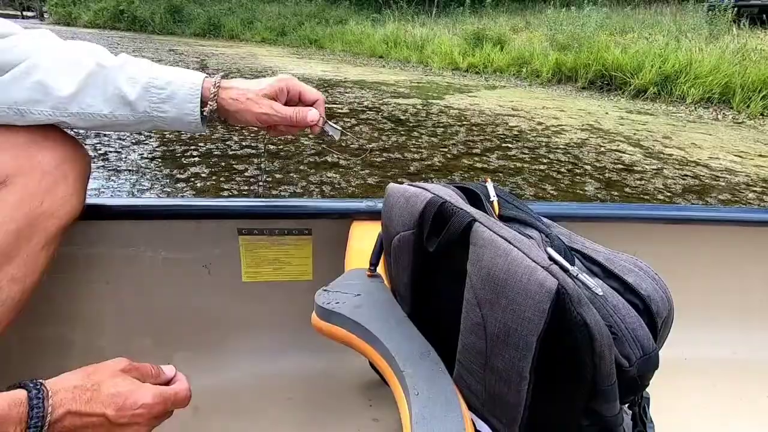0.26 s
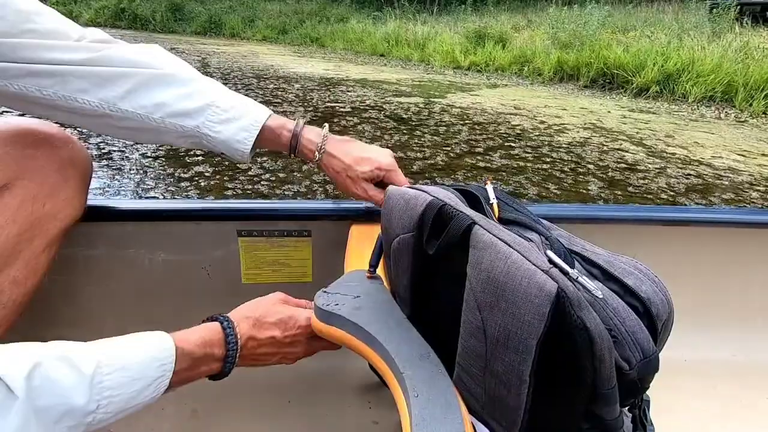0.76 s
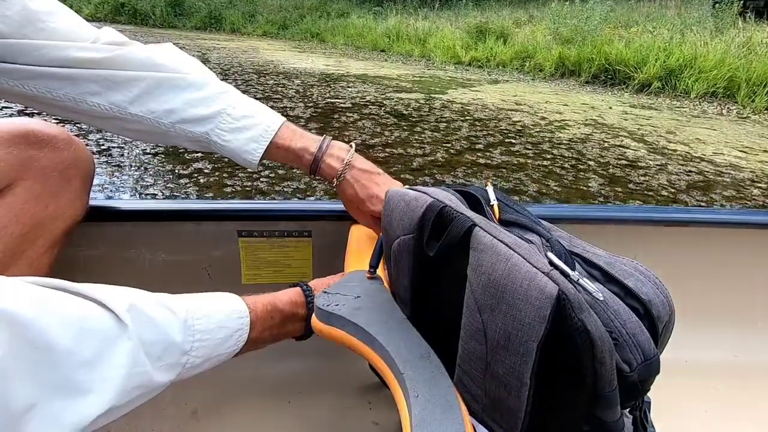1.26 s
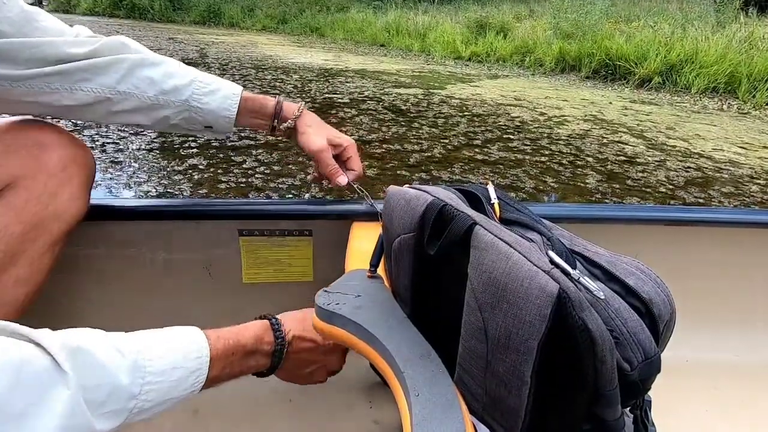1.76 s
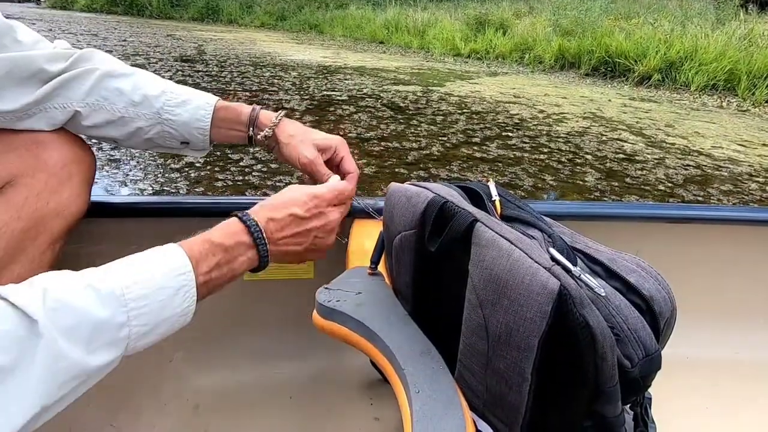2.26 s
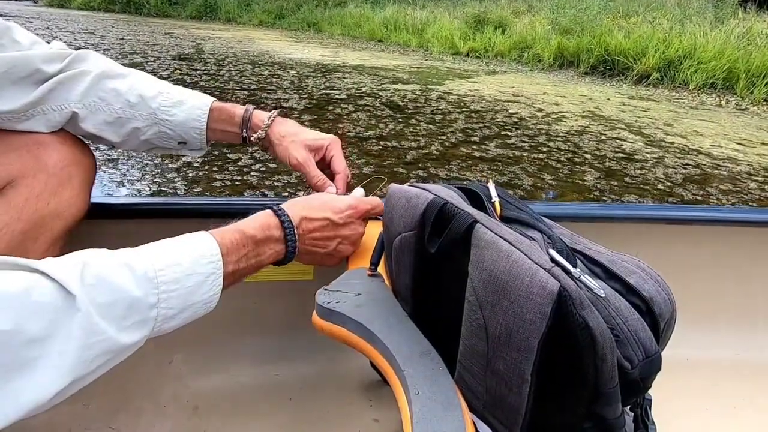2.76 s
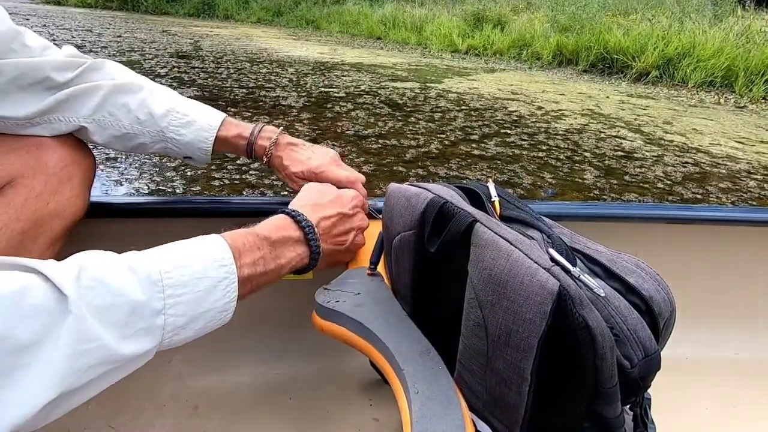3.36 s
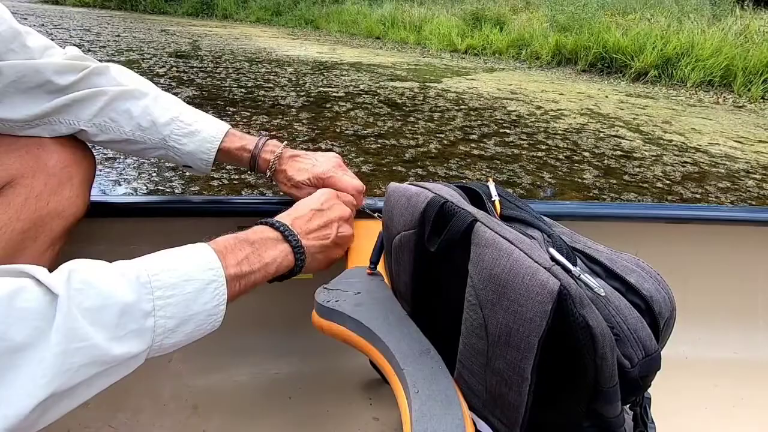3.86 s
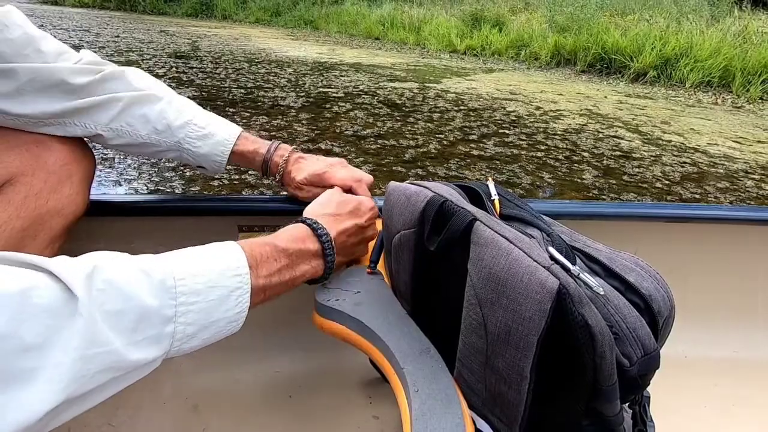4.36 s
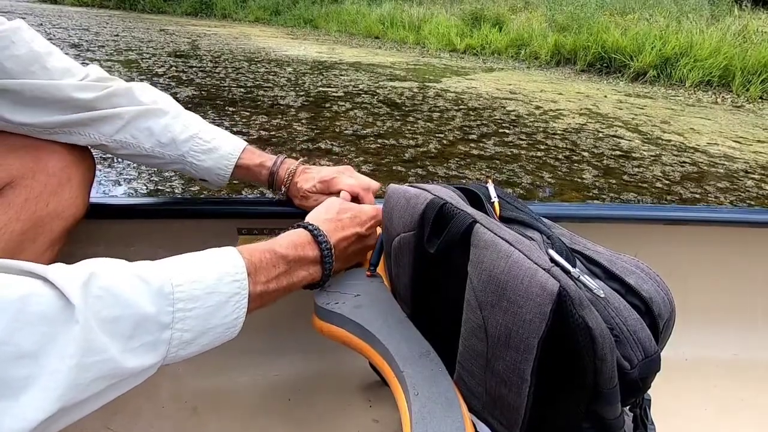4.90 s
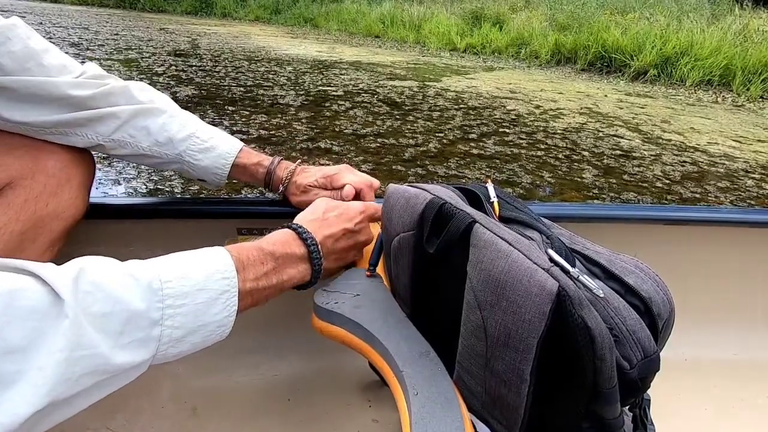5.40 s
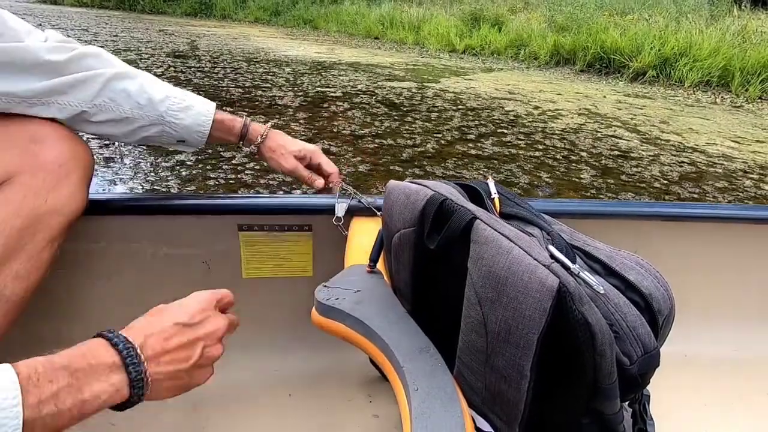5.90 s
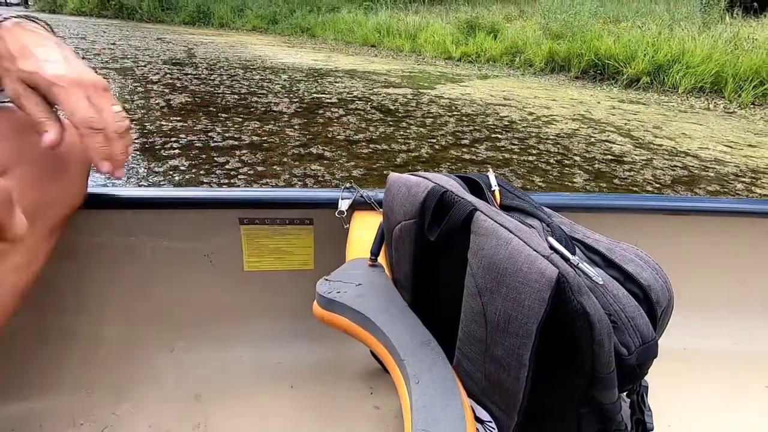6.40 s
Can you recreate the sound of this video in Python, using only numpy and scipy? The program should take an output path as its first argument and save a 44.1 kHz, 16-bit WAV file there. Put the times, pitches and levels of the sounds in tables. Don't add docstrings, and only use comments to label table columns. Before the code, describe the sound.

Outdoors on a still pond, close to a canoe hull. At 0.17-0.26 s loud steel taps and a chain scrape land with a low thud over a wide insect hiss, then cut dead to near silence. From about 0.4 s a quieter hiss fades in with low hull rumble and a few faint clinks at 0.6-0.9. Between 1.2 and 1.9 s links click, knock and slide densely, with strong hollow thumps near 1.25 and 1.48; a thin far bird whistle rises at 1.6-1.8. Smaller clusters follow at 2.1-2.6, 3.05-3.2, 3.45-3.55 and 3.8-4.4, with dull thuds and a faint low drone. It is sparse until a thud and tick at 5.3. From 5.5 to 5.75 a bright, wider rattle tinkles; heavy knocks and clinks follow at 5.85-6.15, then settle into hiss, with a quick splice near 6.54.

```python
import sys
import numpy as np
from scipy import signal
from scipy.fft import rfft, irfft, next_fast_len
from scipy.io import wavfile
from scipy.ndimage import uniform_filter1d

SR = 44100
rng = np.random.default_rng(int(sys.argv[2]) if len(sys.argv) > 2 else 0)


def master_out(mix):
    frames = np.transpose(np.atleast_2d(mix))
    ceiling = np.clip(frames, -1, 1)
    pcm = np.round(ceiling * 32767).astype(np.int16)
    wavfile.write(sys.argv[1], SR, pcm)


def boost_factor(decibels):
    exponent = np.asarray(decibels, float) / 20
    return 10 ** exponent


N = 292824
SECOND_SHOT_S = .33

# (pitch [Hz], width [Hz], level [dB])
RIM_MODES = [(753, 35, -15), (1050, 12, -12), (1307, 46, -8), (1430, 58, 3), (1602, 100, 5.5),
             (1940, 150, 6.5), (2160, 160, -2), (2548, 200, 6), (2905, 44, -1.5), (3432, 67, 0),
             (3660, 33, -7), (4210, 90, -5), (5040, 270, -18.5), (6260, 900, -36), (7610, 300, -24)]
# (pitch [Hz], width [Hz], level [dB])
PANEL_MODES = [(238.6, 28.4, 4), (323.7, 35, -3), (400, 33, -0.5), (458, 38, -7), (519.6, 55, -0.5),
               (638, 77, 6.5), (783, 27, -6.5), (916, 65, -10)]
# (time [s], peak [dB], ring [Hz], decay by 60 dB [s])
HULL_BLOWS = [(1.083, -27, 215, 0.2), (1.145, -24, 185, 0.08), (1.211, -25, 150, 0.04),
              (1.246, -19, 514, 0.034), (1.249, -9.5, 94.4, 0.046), (1.289, -15.5, 187, 0.1),
              (1.376, -25, 450, 0.04), (1.447, -32, 75, 0.23), (1.484, -10, 85.6, 0.15),
              (1.661, -19.5, 117.6, 0.28), (1.826, -17, 185, 0.15), (1.884, -20, 115, 0.19),
              (2.066, -23, 113.5, 0.089), (2.136, -16, 188, 0.09), (2.294, -24, 176, 0.099),
              (2.356, -25, 517, 0.09), (2.441, -26, 199.3, 0.19), (2.465, -22, 430, 0.042),
              (2.611, -15.5, 202.3, 0.19), (3.025, -26.5, 179.8, 0.34), (3.155, -14, 195, 0.06),
              (3.456, -33, 198, 0.34), (3.551, -18.5, 193.7, 0.2), (3.861, -21.5, 118, 0.1),
              (3.956, -12.5, 184.6, 0.1), (4.018, -19.5, 106, 0.13), (4.327, -33.5, 189.5, 0.23),
              (4.51, -29, 66, 0.24), (4.788, -22, 73, 0.11), (5.318, -13, 198, 0.12),
              (5.548, -27, 118, 0.31), (5.628, -36, 210, 0.17), (5.678, -18, 625, 0.11),
              (5.698, -21, 222, 0.094), (5.722, -18, 480, 0.058), (5.867, -19.5, 219, 0.14),
              (5.946, -9, 176, 0.14), (6.025, -21, 185, 0.07), (6.085, -11, 180, 0.095)]
# (time [s], peak [dB], strongest ring [Hz], upper rings [dB])
RIM_TAPS = [(0.1746, 3.5, 1203, -4.5), (0.1835, 5.5, 1376, -3.5), (0.199, -4.5, 2580, 2),
            (0.2285, -12, 2630, -2), (1.2467, -21, 965, -6.5), (1.3605, -16, 865, -13.5),
            (1.4395, -4, 1370, -10), (1.49, -15, 986, -24.5), (1.497, -14.5, 1430, -1),
            (1.5039, -6, 1430, -5), (1.5151, -7.5, 1292, -11), (1.523, -11, 1430, -9),
            (1.292, -35, 1420, -3), (1.39, -22, 2520, -4.5), (1.6769, -10, 1000, -30),
            (1.7047, -10, 1940, -39), (2.0616, -19, 2940, -20), (2.126, -19, 1310, -9),
            (2.6, -18, 1200, -6.5), (2.612, -21, 1170, -6), (3.112, -30, 1430, -10), (3.194, -29, 1550, -5),
            (3.5506, -24, 1250, -19), (3.953, -25, 1430, -7), (3.978, -19.5, 1050, -7),
            (3.994, -29, 1430, -9), (4.027, -29.5, 1390, -25), (4.128, -28.5, 1440, -1.5),
            (4.7983, -29, 970, -21), (5.3095, -29, 3020, 6), (5.5524, -11, 4210, -2),
            (5.6998, -12, 3070, 0.5), (5.599, -26, 3000, -0.5), (5.6145, -11, 2530, 0.5),
            (5.68, -10, 1510, -0.5), (5.7131, -17.5, 2680, 2.5), (5.8365, -21, 970, -26),
            (5.97, -17, 2540, -9), (1.537, -12, 1450, -3), (6.0576, -15, 1150, -21.5),
            (6.0785, -6, 1280, -6.5), (5.941, -11, 1360, -13.5), (6.004, -27.5, 1930, -16),
            (6.099, -13, 1430, -8.5)]
# (time [s], peak [dB], strongest ring [Hz], upper rings [dB])
LINK_KNOCKS = [(0.5845, -32, 1030, -16), (0.7665, -27.5, 920, 0), (0.8307, -24.5, 1270, -3.5),
               (.856, -19, 2204, -8), (1.235, -29.5, 1500, -2), (1.3956, -14, 1050, -20),
               (1.4359, -11, 1370, -5), (1.4475, -5, 1920, -6), (1.4745, -15, 1520, -8.5),
               (1.5694, -11, 2640, -12), (1.7622, -7, 1430, -5.5), (1.7831, -13, 1055, -23),
               (1.896, -19, 1390, -40), (2.352, -16, 1550, -5.5), (2.4392, -7, 1247, -12),
               (2.4632, -24.5, 1300, -16), (2.5285, -22, 1020, -24), (3.062, -18, 1060, -22),
               (3.1473, -11, 1430, -8), (3.4433, -29.5, 1370, -44), (3.777, -26, 1420, -7),
               (3.9639, -9.5, 1330, -6.5), (4.1442, -20, 1440, -7.5), (4.3181, -19, 1610, -3.5),
               (4.349, -19, 2110, -27), (5.608, -16, 1950, 5.5), (5.6355, -6, 1510, -1),
               (5.653, -13, 2500, 1.5), (5.8719, -8, 1910, -8), (6.179, -18, 1150, -30)]
# (time [s], peak [dB], strongest ring [Hz], upper rings [dB])
CHAIN_SLIDES = [(.2064, -11, 2680, 0), (.2445, -11, 2050, -12), (.215, -16.5, 1430, -5),
                (.256, -18.5, 1430, -9), (.7794, -29.5, 1240, -24), (1.5097, -2.5, 1313, -12),
                (2.29, -27, 1313, -15), (2.99, -36, 1430, -10), (3.076, -22, 1430, -19),
                (5.553, -19, 1300, -3), (6.041, -17, 1040, -18), (3.094, -22, 1400, -9),
                (6.12, -22, 2070, -6), (1.6576, -12.5, 1097, -0.5), (1.7494, -16, 1940, -19),
                (1.8219, -9, 1596, -4.5), (1.855, -8, 1430, -18.5), (1.8754, -21, 1430, -25.5),
                (2.104, -25, 1430, -18), (2.2203, -19, 1580, -8.5), (2.584, -23, 980, -31),
                (3.0403, -22.5, 1070, -5), (3.1284, -21.5, 2100, -5), (3.9025, -21.5, 1464, -18),
                (5.628, -11, 3660, -3), (5.538, -17.5, 2490, -3.5), (5.669, -11, 4210, 3),
                (5.6845, -19, 3500, 1), (5.719, -25, 2600, -4), (5.906, -17.5, 1190, -3),
                (5.9348, -7, 1355, -6), (6.0894, -9, 1380, -7.5), (6.1124, -16, 1140, -26)]
# (time [s], peak [dB], strongest ring [Hz], upper rings [dB])
CLEAN_CLICKS = [(2.113, -13, 1430, -8), (2.1215, -7, 1390, -3), (2.2605, -13, 1940, -2),
                (2.139, -28, 2950, -20), (2.249, -29, 3050, -20), (1.447, -6, 1410, -4),
                (1.5405, -8, 2560, -2), (1.477, -15, 2680, -2), (5.611, -7, 2070, 0), (5.6135, -7, 3050, 0),
                (5.652, -7, 2530, 0), (5.6385, -9, 1530, -6), (5.672, -10, 4200, -3),
                (5.9345, -10, 1200, -6), (6.095, -9, 1550, -6), (5.875, -10, 1640, -3),
                (3.1475, -14, 2700, -2), (6.08, -13, 760, -8)]


def curve(table):
    s, *columns = np.transpose(table)
    return [np.interp(np.arange(N) / SR, s, c) for c in columns]


def colour(x, points):
    hz, db = np.transpose(points)
    size = next_fast_len(len(x))
    log_f = np.log(np.arange(size // 2 + 1) * SR / size + 1)
    gain = boost_factor(np.interp(log_f, np.log(hz), db))
    return irfft(rfft(x, size) * gain, size)[:len(x)]


def unit(x):
    return x / np.sqrt(np.mean(x ** 2))


def peak(x, db):
    return x * boost_factor(db) / np.abs(x).max()


def walk(rate):
    k = int(SR / rate)
    held = np.repeat(rng.standard_normal(N // k + 1), k)
    return uniform_filter1d(held, k)[:N]


def ring(hz, width_hz, db, size):
    t = np.arange(size)[:, None] / SR
    modes = boost_factor(db) * np.exp(-np.pi * width_hz * t) * np.sin(2 * np.pi * hz * t)
    return modes.sum(axis=1)


def resonate(x, response):
    return signal.fftconvolve(x, response)[:N]


def add(out, s, x):
    i = int(s * SR)
    out[i:i + len(x)] += x[:N - i]


def wake(events, rise_db_s, fall_db_s):
    s, db = np.transpose(events)[:2]
    blows = np.bincount((s * SR).astype(int), boost_factor(2 * db), N)

    def fade(x, db_s):
        return signal.lfilter([1], [1, -boost_factor(-2 * db_s / SR)], x)

    after = fade(blows, fall_db_s)
    before = fade(blows[::-1], rise_db_s)[::-1]
    return np.sqrt(after + before - blows)


def links(scatter_db=3.5, damp_hz=40, lumps=0.47, upper_ms=14, best_width_hz=55, soft_hz=5200,
          body_db=-14, tail_db=-17, tail_ms=18, lead_ms=1.6, wander=.008):
    # (time [s], peak [dB])
    brushes = [
        (2.002, -30),
        (2.711, -36.5),
        (3.281, -31.5),
        (3.378, -36),
        (3.846, -32.5),
        (3.93, -29),
        (4.108, -29.5),
    ]
    brush_taps = [(*row, 1430, -4) for row in brushes]
    kinds = [(RIM_TAPS + brush_taps, 7.4, .9, 6),
             (LINK_KNOCKS, 10.4, 1.13, 4.4),
             (CHAIN_SLIDES, 16, 2.3, -3),
             (CLEAN_CLICKS, 3, .9, -6)]
    out, size = np.zeros(N), 2048
    hz, width, db = np.transpose(RIM_MODES)
    low = hz < 2300
    t_ms = np.arange(size) * 1000 / SR
    for rows, long_ms, rise_ms, lead_db in kinds:
        lead = boost_factor(lead_db) * np.exp(-t_ms / lead_ms)
        main = np.exp(-(t_ms / long_ms) ** 2)
        tail = boost_factor(tail_db) * np.exp(-t_ms / tail_ms)
        shape = (1 - np.exp(-t_ms / rise_ms)) * (lead + main + tail)
        for s, top_db, best_hz, upper_db in rows:
            spot = rng.standard_normal((2, len(hz)))
            grit, gap = rng.standard_normal((2, size))
            burst = grit * np.exp(lumps * gap) * shape
            f, g = hz * (1 + wander * spot[0]), db + scatter_db * spot[1]
            w = width + damp_hz * f / 1500
            lower = signal.fftconvolve(burst, ring(f[low], w[low], g[low], size))
            short_burst = burst * np.exp(-t_ms / upper_ms)
            upper = signal.fftconvolve(short_burst, ring(f[~low], w[~low], g[~low], size))
            best_width = best_width_hz + damp_hz * best_hz / 1500
            best = signal.fftconvolve(burst, ring(best_hz, best_width, 0, size))
            damped_panels = np.transpose(PANEL_MODES) + [[0], [30], [0]]
            body = signal.fftconvolve(burst, ring(*damped_panels, size))
            thin_db = 4 * (best_hz > 2300)
            touch = peak(lower, -8.5 - thin_db) + peak(best, -9.5 + thin_db) + peak(upper, upper_db - 2)
            touch = touch + peak(body, body_db + 10 * np.log10(long_ms / 10) - thin_db)
            add(out, s - .0004, boost_factor(top_db) * touch)
    return signal.sosfilt(signal.butter(3, soft_hz, fs=SR, output="sos"), out)


def ticks(long_ms=0.77):
    # (time [s], peak [dB])
    cracks = [(0.176, -33), (0.184, -40), (0.2287, -37), (0.2671, -31), (1.448, -35.5), (1.505, -37),
              (1.6625, -40.5), (1.825, -47.5), (2.3525, -50), (3.1478, -42.5), (5.3122, -34), (5.5258, -44),
              (5.608, -29), (5.6527, -28), (5.8735, -42), (5.939, -33.5), (6.092, -35.5)]
    bright = [(3000, -32.5), (5000, 7.5), (8000, -1.0), (11000, -12.0), (16000, -35.5)]
    out, t_ms = np.zeros(N), np.arange(1024) * 1000 / SR
    shape = t_ms * np.exp(-t_ms / long_ms) + 0.13 * np.exp(-t_ms / 6)
    for s, top_db in cracks:
        crack = rng.standard_normal(len(t_ms)) * shape
        add(out, s, peak(colour(crack, bright), top_db + 10))
    return out


def thuds(scatter_db=4, push_ms=2.38, panel_db=8):
    # (pitch [Hz], width [Hz], level [dB])
    low_panels = [(118, 25, -17), (150, 21, -8.5), (202, 2.4, -4.5)]
    # (time [s], peak [dB], ring [Hz], decay by 60 dB [s])
    seat_drop = [
        (0.181, -15, 187.3, 0.097),
        (0.194, -8, 118, 0.55),
    ]
    out, size = np.zeros(N), 8192
    hz, width, db = np.transpose(low_panels + PANEL_MODES) - [[0], [0], [panel_db]]
    push = np.hanning(int(push_ms * SR / 1000))
    swell = 1 - np.exp(-np.arange(size) / (0.005 * SR))
    for s, top_db, best_hz, t60 in seat_drop + HULL_BLOWS:
        spot = rng.standard_normal((2, len(hz)))
        own_width = np.log(1000) / np.pi / np.clip(t60, .02, 1)
        all_hz = np.append(hz * (1 + 0.016 * spot[0]), best_hz)
        all_width = np.append(width + own_width, own_width)
        all_db = np.append(db + scatter_db * spot[1], 0)
        body = ring(all_hz, all_width, all_db, size)
        add(out, s, peak(signal.fftconvolve(push, body * swell), top_db))
    return out


def rattle(pull):
    # (end time [s], level [dB])
    scrapes = [
        (1.355, -52),
        (1.432, -33.5),
        (2.435, -50),
        (3.035, -46.5),
        (3.12, -40),
        (3.955, -40),
        (6.05, -45),
    ]
    gain = pull * boost_factor(-6.5) + wake(scrapes, 180, 500) + wake(CHAIN_SLIDES, 1600, 540) * boost_factor(-27)
    gain = gain + wake(LINK_KNOCKS + RIM_TAPS + CLEAN_CLICKS, 3000, 500) * boost_factor(-26.5)
    chatter = rng.standard_normal(N) * boost_factor(5.5 * walk(200) + 2 * walk(40))
    rim = resonate(chatter, ring(*np.transpose(RIM_MODES), 2048))
    return gain * unit(colour(rim, [(700, -23.0), (950, 9.5), (5000, 0.5), (9000, 1.5), (14000, -34.5)]))


def drag(pull):
    gain = pull * boost_factor(-3.5) + wake(CHAIN_SLIDES + LINK_KNOCKS, 700, 280) * boost_factor(-26.5)
    gain = gain + wake(HULL_BLOWS, 590, 420) * boost_factor(-27.0)
    slips = rng.standard_normal(N) * boost_factor(3.5 * walk(90) + 1.5 * walk(25))
    panels = resonate(slips, ring(*np.transpose(PANEL_MODES), 4096))
    return gain * unit(colour(panels, [(200, -17.5), (280, 2.0), (900, -7.5), (1500, -23.0)]))


def hum(shift, pull):
    gain = shift * boost_factor(-20.5) + wake(HULL_BLOWS, 250, 140) * boost_factor(-18) + pull * boost_factor(3)
    free_panels = ring(np.array([164, 192]), np.array([9, 14]), np.array([0, -5]), 8192)
    return gain * unit(resonate(rng.standard_normal(N), free_panels))


def rumble(shift):
    # (frequency [Hz], level per Hz [dB])
    mount_spectrum = [(12, -49.5), (25, 3), (45, 3.5), (80, 0), (120, 0.5), (150, -14), (250, -52.5),
                      (600, -130)]
    gain = shift * boost_factor(-2.5) + wake(HULL_BLOWS, 300, 150) * boost_factor(-28.5)
    return unit(colour(rng.standard_normal(N), mount_spectrum)) * gain * boost_factor(0.95 * walk(20))


def hands():
    # (time [s], level [dB])
    weight_moves = [(.45, -57), (.64, -37.5), (1.0, -53), (1.09, -28.5), (1.49, -23.5), (1.96, -31),
                    (2.39, -37.5), (2.63, -27.5), (2.78, -35), (3.16, -25), (3.28, -45.5), (3.71, -45),
                    (3.97, -26), (4.15, -47.5), (4.79, -32), (6.1, -37.5), (6.27, -41), (6.5, -34.5)]
    # (time [s], level [dB])
    chain_pull = [(.45, -62.5), (1.1, -43), (1.19, -57), (1.4, -46), (1.9, -44.5), (1.97, -49.5),
                  (2.6, -47.5), (2.7, -59), (2.95, -60), (3.45, -45), (3.66, -59), (4.14, -47), (4.85, -51),
                  (5.05, -61), (5.42, -55.5), (5.72, -34), (5.8, -52), (6.45, -48)]
    shift, pull = boost_factor(curve(weight_moves)[0]), boost_factor(curve(chain_pull)[0])
    return rumble(shift) + hum(shift, pull) + drag(pull) + rattle(pull)


def swing():
    # (time [s], level [dB])
    tinkle_level = [
        (5.45, -91),
        (5.53, -51),
        (5.62, -42),
        (5.71, -47),
        (5.75, -84.5),
        (5.92, -84.5),
        (5.95, -39.5),
        (5.98, -80.5),
    ]
    touch = rng.standard_normal(N) * boost_factor(4.7 * walk(120))
    hz = 6800 * 1.035 ** (np.arange(20) + rng.uniform(-.5, .5, 20))
    tinkle = colour(resonate(touch, ring(hz, 85, -hz / 350, 1024)), [(5500, -33), (7000, -1.0)])
    out = unit(tinkle) * np.maximum(boost_factor(curve(tinkle_level)[0]) - boost_factor(-80), 0)
    ping_s, ping_hz, width_hz, ping_db = 1.59, 2560, 56, -24
    soft_start = np.minimum(np.arange(2048) / 150, 1)
    ping = signal.fftconvolve(np.hanning(9), ring(ping_hz, width_hz, 0, 2048) * soft_start)
    add(out, ping_s, peak(ping, ping_db))
    return out


def drone(hz=165):
    # (time [s], level [dB])
    drone_level = [
        (.45, -60),
        (2.0, -51),
        (4.2, -40),
        (5.1, -49.5),
        (6.25, -51),
        (6.5, -31),
        (6.55, -53),
    ]
    phase = 2 * np.pi * np.cumsum(hz * (1 + 0.013 * walk(13))) / SR
    return np.sin(phase) * boost_factor(curve(drone_level)[0] + 1 + 0.58 * walk(14))


def insects(spectrum, flicker_db=0.8, swell_db=2.0):
    out = 0
    for hz in 700 * 1.25 ** np.arange(13):
        choir = colour(rng.standard_normal(N), [(hz / 1.5, -30), (hz, 0), (hz * 1.5, -30)])
        out = out + choir * boost_factor(flicker_db * walk(70) + swell_db * walk(3.325))
    low = colour(rng.standard_normal(N), [(500, -3), (700, -30)])
    return unit(colour(out + low, spectrum))


def bank():
    # (frequency [Hz], level per Hz [dB])
    first_spectrum = [(24, -53.5), (40, 0), (80, -18), (160, -12), (400, -29), (1050, -31), (2310, -22.5),
                      (2610, -27), (3310, -12.5), (4100, -8), (6930, -13), (8590, -30.5), (10400, -31.5),
                      (12000, -82), (15600, -102), (22000, -120)]
    # (frequency [Hz], level per Hz [dB])
    later_spectrum = [(500, -51), (800, -30.5), (2500, -20), (3150, -5), (3600, -3.5), (4200, -7),
                      (4900, -1), (5400, -14), (6000, -19), (7000, -18), (8100, -23.5), (8500, -34),
                      (10800, -44.5), (12000, -78.5)]
    t = np.arange(N) / SR
    first = insects(first_spectrum) * boost_factor(-38)
    later = insects(later_spectrum) * boost_factor(-47 + 0.27 * t)
    return np.where(t > SECOND_SHOT_S, later, first)


def bird():
    # (time [s], pitch [Hz], level [dB])
    whistle = [
        (1.575, 3050, -70),
        (1.59, 3150, -38),
        (1.66, 3310, -41),
        (1.74, 3400, -46),
        (1.8, 3420, -50),
        (1.82, 3420, -75),
    ]
    hz, db = curve(whistle)
    return boost_factor(db) * (db > -69) * np.sin(2 * np.pi * np.cumsum(hz) / SR)


def port():
    late = np.arange(N) / SR > SECOND_SHOT_S
    return links() + ticks() + thuds() + late * hands() + swing() + bank() + bird()


def shots():
    first_ends_s, fade_from_s, third_from_s = 0.2676, 0.39, 6.54
    fade_s, splice_s = 0.064, 0.014
    t = np.arange(N) / SR
    tail_db = -11 - 1597 * np.clip(t - first_ends_s, 0, 1)
    first = boost_factor(-5.5 + (t > first_ends_s) * tail_db)
    fade_in = 1 - np.exp(-(np.maximum(t - fade_from_s, 0) / fade_s) ** 2)
    second = boost_factor(3 - 0.4932 * t) * fade_in
    third = boost_factor(-6) * (1 - np.exp(-np.abs(t - third_from_s) / splice_s))
    return first + np.where(t < third_from_s, second, third) + boost_factor(-80)


def scene():
    # (frequency [Hz], level [dB])
    first_ports = [(60, 1), (200, 0), (500, 3), (1200, 6), (2000, -3), (3500, -6), (7000, 3), (12000, 3)]
    # (frequency [Hz], level [dB])
    second_ports = [(60, -2), (110, 3), (200, -11), (380, -4), (700, 3), (1290, 6), (2380, -11),
                    (4400, -10.5), (8120, 2), (15000, -4)]
    # (frequency [Hz], level [dB])
    right_lean = [(100, -3), (300, -20), (1200, -20), (1700, -4), (3500, -5), (6000, -14)]
    # (time [s], level [dB])
    port_width = [
        (.32, -56.5),
        (4.6, -49.5),
        (5.0, -10.5),
        (5.35, -3),
        (5.72, 3.5),
        (6.4, -32.5),
    ]
    mid, other = port() + drone(), port()
    trace = colour(other, [(3000, -58.0), (5000, -42.0), (7000, -25.5)])
    lean = colour(mid, right_lean)
    first = colour(other, first_ports) - lean
    second = (colour(other, second_ports) - lean * boost_factor(-15)) * boost_factor(curve(port_width)[0]) + trace
    side = np.where(np.arange(N) / SR < SECOND_SHOT_S, first, second)
    return np.array([mid + side, mid - side])


def top_cut(x):
    return signal.sosfilt(signal.butter(12, 15900, fs=SR, output="sos"), x)


def record(dry):
    cut, top = dry * shots(), .9
    soft = np.tanh((np.abs(cut) / top) ** 3) ** (1 / 3) * top * np.sign(cut)
    return top_cut(soft)


dry = scene()
out = record(dry)
master_out(out)
```